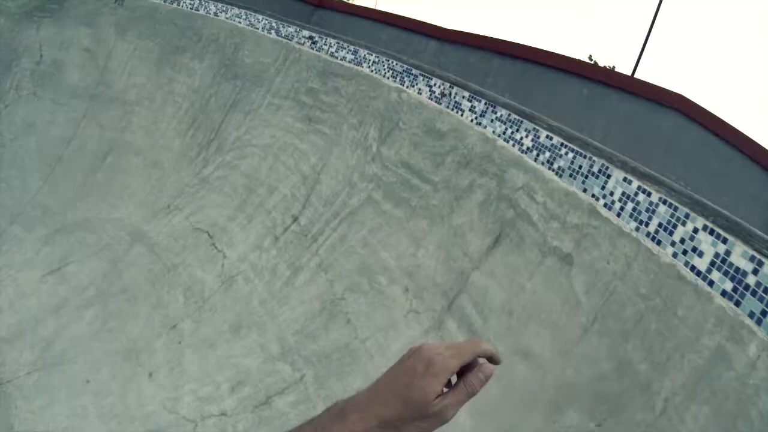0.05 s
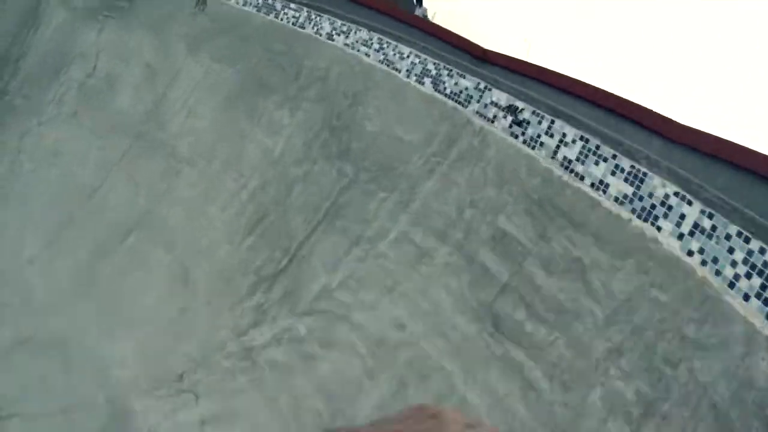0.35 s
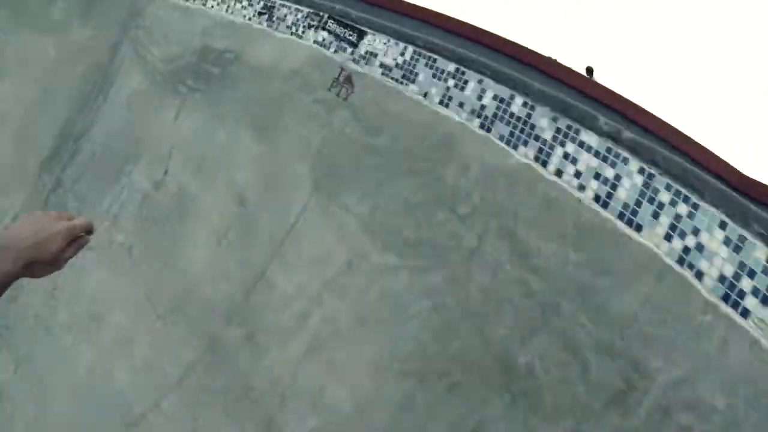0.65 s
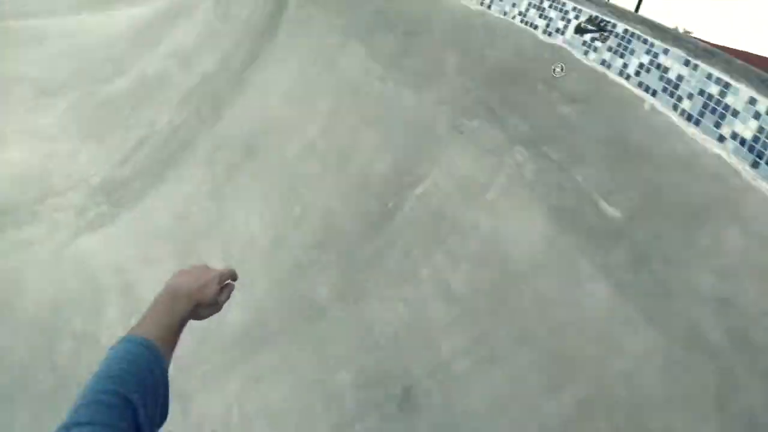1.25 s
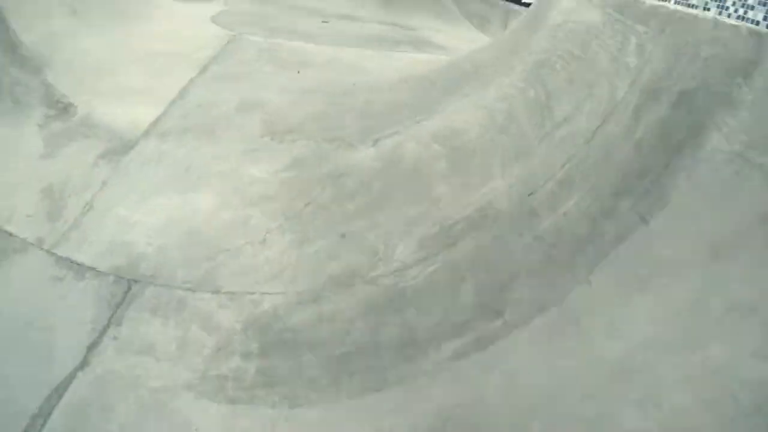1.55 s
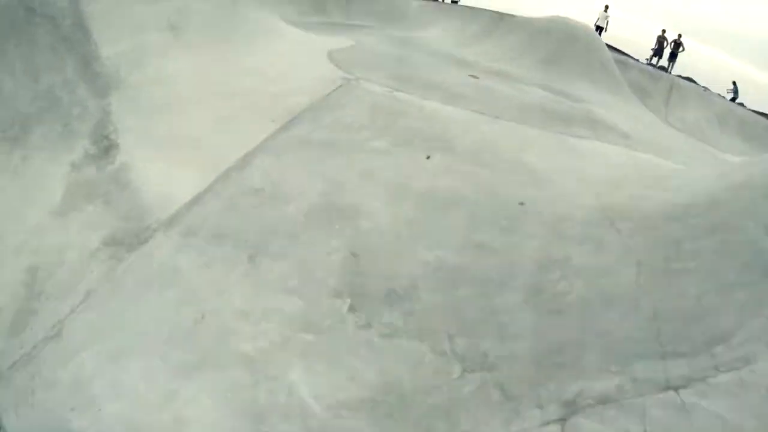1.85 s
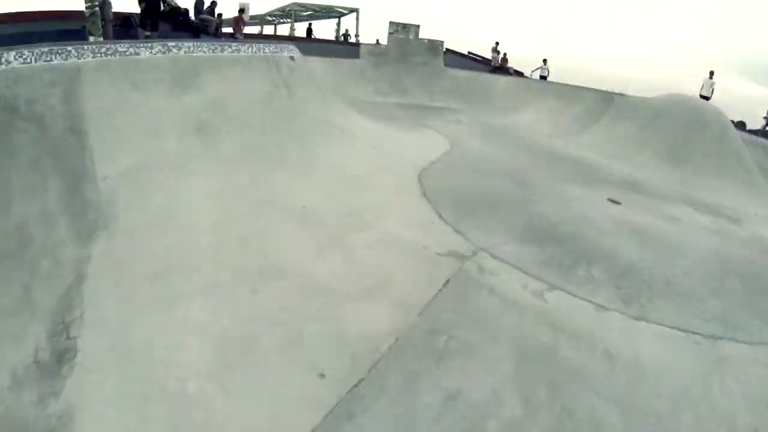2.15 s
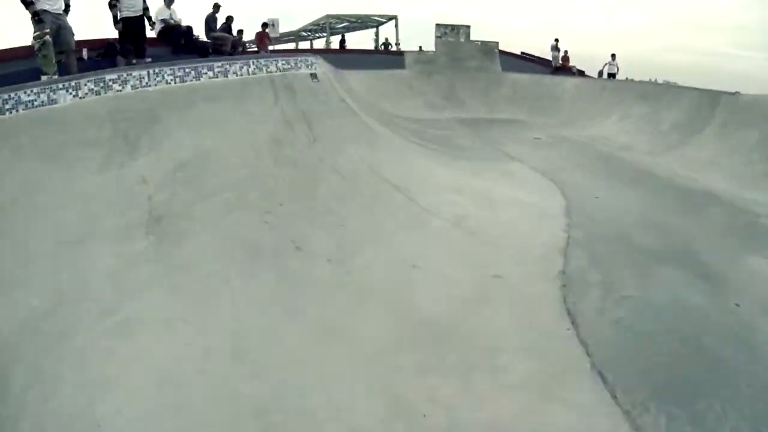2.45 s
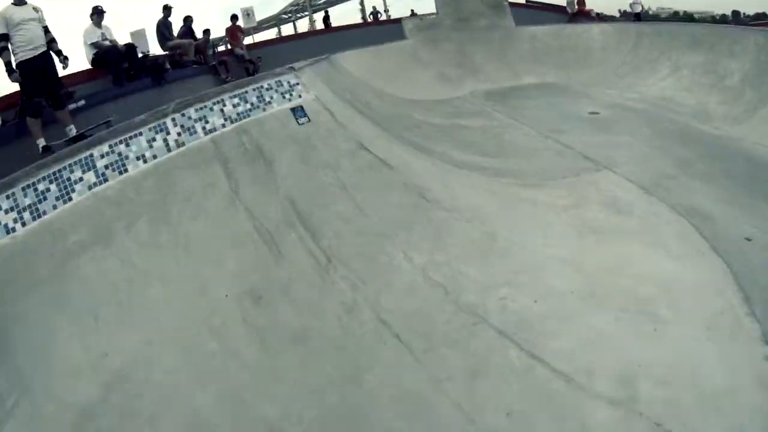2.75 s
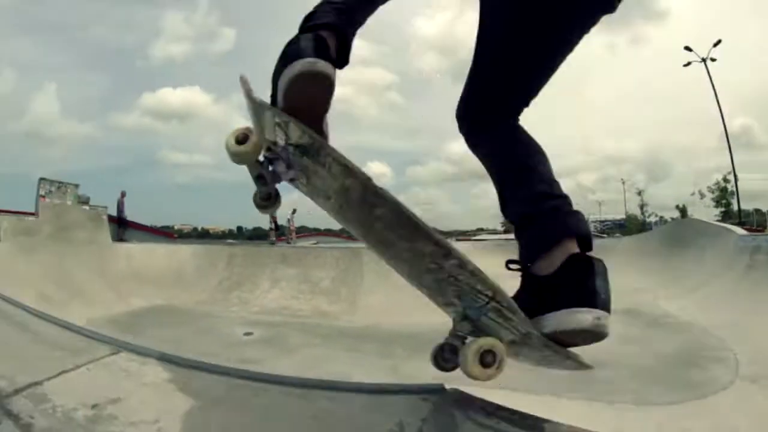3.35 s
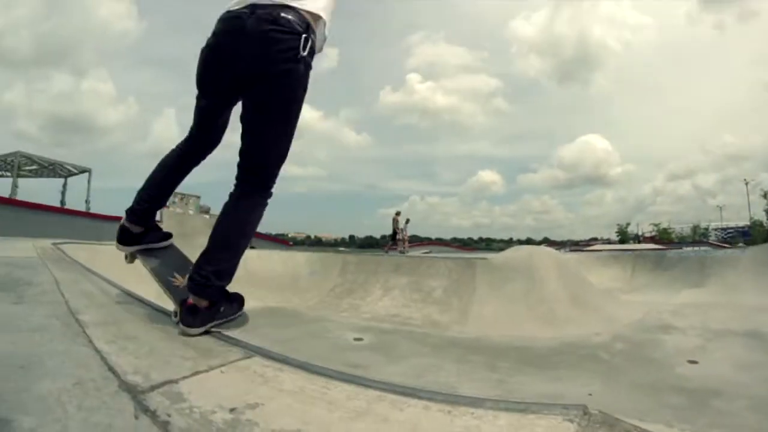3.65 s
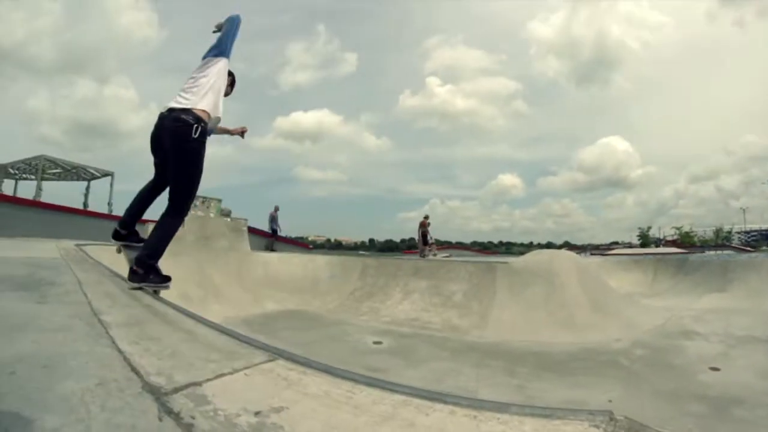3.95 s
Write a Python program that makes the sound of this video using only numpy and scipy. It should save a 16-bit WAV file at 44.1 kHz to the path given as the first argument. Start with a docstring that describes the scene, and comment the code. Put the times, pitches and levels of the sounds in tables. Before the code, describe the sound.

Skateboard wheels hum close by on smooth concrete under low wind buffeting, then turn rougher and hissier. The wind drops away and the board hits the bowl's edge with sharp clacks, a gritty scrape and a short grind.

```python
"""A skateboard carves a concrete bowl, heard from close behind with wind thudding on the microphone.
The wheels hum on smooth concrete, then from 1.8 s roar on a rougher slab. From 3 s the board is heard
from the rim, out of the wind: it rolls up, clatters over the edge, scrapes its tail, slaps down and
grinds on. The blows echo briefly in the bowl, and the hardest overload the microphone."""
import sys
import numpy as np
from scipy import signal
from scipy.fft import rfft, irfft, next_fast_len
from scipy.io import wavfile
from scipy.ndimage import uniform_filter1d, map_coordinates

SR = 44100
rng = np.random.default_rng(int(sys.argv[2]) if len(sys.argv) > 2 else 0)


def store_pcm(level_fs):
    """Save levels as 16-bit WAV."""
    pcm = np.round(np.clip(level_fs, -1, 1) * 32767).astype(np.int16)
    wavfile.write(sys.argv[1], SR, np.atleast_2d(pcm).T)


N = 176400
TIME = np.arange(N) / SR
SLAB_S, RIM_S, EDGE_S, SCRAPE_S = 1.83, 2.965, 3.17, 3.278


def amp(db):
    return 10 ** (np.asarray(db) / 20)


def unit(x):
    return x / np.sqrt(np.mean(x ** 2) + 1e-20)


def noise():
    return rng.standard_normal(N)


def along(points, hz):
    """Interpolate (Hz, value) points on a log frequency axis."""
    point_hz, values = np.transpose(points)
    return np.interp(np.log(hz + 1), np.log(point_hz + 1), values)


def curves(rows):
    """One value per sample for each column after the time."""
    times, *columns = np.transpose(rows)
    return [np.interp(TIME, times, column) for column in columns]


def wobble(knots_per_s):
    """A smooth random curve."""
    return map_coordinates(rng.standard_normal(4096), [TIME * knots_per_s], mode="wrap")


def after(s, fade_s):
    """A gate that opens around time s."""
    return np.clip((TIME - s) / fade_s + .5, 0, 1)


def filtered(x, response):
    """Apply a gain given as a function of Hz."""
    size = next_fast_len(N + SR // 2)
    return irfft(rfft(x, size) * response(np.fft.rfftfreq(size, 1 / SR)), size)[:N]


def coloured(x, colour):
    """Shape x by (Hz, dB) points, rolling off beyond both ends; rms 1."""
    low_hz, high_hz = colour[0][0] / 2, colour[-1][0] * 2
    skirts = lambda hz: 1 / np.sqrt((1 + (low_hz / (hz + 1)) ** 10) * (1 + (hz / high_hz) ** 10))
    return unit(filtered(x, lambda hz: amp(along(colour, hz)) * skirts(hz)))


def grit(per_s, share):
    """Force of a rough surface: single grains, with their share of the power, over a dense bed."""
    grains = (rng.random(N) < per_s / SR) * noise()
    return np.sqrt(share) * unit(grains) + np.sqrt(1 - share) * noise()


def resonance(centre_hz, width_hz):
    """A randomly driven resonance whose centre may move; rms 1."""
    slow = lambda: filtered(noise(), lambda hz: 1 / np.sqrt(1 + (hz / width_hz) ** 4))
    phase = 2 * np.pi * np.cumsum(centre_hz * np.ones(N)) / SR
    return unit(slow() * np.cos(phase) + slow() * np.sin(phase))


def add(track, start_s, sound):
    part = track[round(start_s * SR):][:len(sound)]
    part += sound[:len(part)]


# Blows of wheels, trucks and deck. Each row: start in seconds, ring in Hz, then ring, deck, clack and
# crack gains in dB.
BLOWS = [ (3.181, 800, 2, -9, -12, -13), (3.192, 760, 2, -17, -15, -12.5), (3.2, 812, 0.5, -8, -11, -8.5),
         (3.209, 830, 3.5, 2, -2.5, -16), (3.214, 812, 7, -11.5, -9, -8), (3.258, 590, -9, -29, -13, -38),
         (3.278, 315, -5.5, -21, -14, -15), (3.284, 620, -15, -8.5, -16.5, -12),
         (3.305, 552, 0, -8, -3, -13), (3.322, 569, 2.5, -4, 2.5, -4.5), (3.33, 704, -13, -17, -18, -15.5),
         (3.335, 547, -10, -12.5, -15, -22), (3.367, 600, -30, -28, -22, -24),
         (3.5172, 2140, 4.5, -12, 3, -7), (3.524, 850, -4, -19, -10, -25), (3.5402, 950, -14, -4, -6, -10),
         (3.551, 854, -15, -4, 2, -7.5), (3.638, 213, -11.5, -13, -7, -27),
         (3.643, 864, -13, -18, -14, -36), (3.686, 863, -18, -20, -18, -45),
         (3.702, 2064, -8, -36, -16.5, -36), (3.752, 836, -14, -34, -27, -42),
         (3.831, 810, -20.5, -36, -45, -50), (3.900, 844, -19, -44, -34, -47),
         (3.957, 846, -24, -45, -28.5, -50)]
# Deck modes. Each row: frequency in Hz, gain in dB, T60 in seconds.
DECK_MODES = [(107, -18.5, 0.076), (170, -10.5, 0.049), (241, -7, 0.08), (301, -11, 0.048),
              (401, -4.5, 0.055), (480.4, -4, 0.068), (686, -3.5, 0.046), (850, -0.5, 0.051),
              (993, -4.5, 0.047), (1298, -12, 0.053)]
# Impact spectra. Each row: frequency in Hz, gain in dB.
CLACK_COLOUR = [(200, -16.5), (400, -10), (700, -2.5), (1000, -3.5), (1500, -7.5), (2100, 1.5),
                (2700, -1.5), (3100, -7), (3500, -7.5), (4500, -20), (7000, -57), (15000, -52)]
CRACK_COLOUR = [(1500, -30), (3500, 9.5), (6300, 1.5), (7500, -6), (11000, -10), (15500, -17)]

def blows(clack_t60_s=0.034, crack_t60_s=0.024, attack_s=0.00048):
    """Each blow rings the struck part and the deck, with a woody clack and a hard crack."""
    track, t = np.zeros(N), np.arange(SR // 5) / SR
    clack, crack = coloured(noise(), CLACK_COLOUR), coloured(noise(), CRACK_COLOUR)
    mode = lambda hz, t60_s: amp(-60 * t / t60_s) * np.sin(2 * np.pi * hz * t)
    for start_s, ring_hz, ring_db, deck_db, clack_db, crack_db in BLOWS:
        offset = rng.integers(N - len(t))
        deck = sum((-1) ** k * amp(db + rng.normal(0, 3)) * mode(hz * (1 + 0.05 * rng.normal()), t60_s)
                   for k, (hz, db, t60_s) in enumerate(DECK_MODES))
        ring = mode(ring_hz, t60_s=0.039 * np.sqrt(800 / ring_hz))
        hit = amp(ring_db) * ring + amp(deck_db) * deck
        hit += amp(clack_db - 60 * t / clack_t60_s) * clack[offset:][:len(t)]
        hit += amp(crack_db - 60 * t / crack_t60_s) * crack[offset:][:len(t)]
        add(track, start_s, hit * (1 - np.exp(-t / attack_s)))
    return track


# Travel along the rim. Each row: time in seconds, wheel level in dB, grind level in dB.
RIM_LEVELS = [(2.97, -27.5, -50), (3.08, -24, -45), (3.16, -27.5, -27), (3.24, -24, -31.5), (3.3, -26, -28),
              (3.37, -34.5, -30.5), (3.46, -28.5, -29.5), (3.505, -36, -34.5), (3.55, -20, -24),
              (3.585, -32, -24.5), (3.61, -26.5, -25), (3.66, -21, -24), (3.73, -28, -32.5),
              (3.775, -27, -29.5), (3.8, -34, -36.5), (3.93, -34.5, -40), (4, -30.5, -41.5)]
# Roll and grind spectra at the rim. Each row: frequency in Hz, gain in dB.
RIM_ROLL_COLOUR = [(40, -20), (110, -2.5), (165, -1.5), (230, 0), (320, -7.5), (430, -0.5), (520, 3),
                   (640, 2), (760, 3), (880, 11), (1100, -8), (1500, -19), (2500, -24)]
GRIND_COLOUR = [(700, -20), (1300, 0), (1700, 4), (2300, 4.5), (3000, -4.5), (3700, -3), (4500, -18.5),
                (5700, -23), (6600, -29), (7500, -29), (11000, -32), (15500, -43)]

def rim_slide():
    """The wheels roll up to the rim, then the truck grinds along it and rings faintly."""
    wheel_db, grind_db = curves(RIM_LEVELS)
    slips_db = 1.34 * wobble(110)
    wheels = amp(wheel_db + slips_db) * coloured(grit(per_s=370, share=0.21), RIM_ROLL_COLOUR)
    truck = amp(-25) * resonance(centre_hz=6560, width_hz=240)
    grind = amp(grind_db + slips_db) * (coloured(grit(per_s=700, share=0.28), GRIND_COLOUR) + truck)
    return wheels * after(RIM_S, fade_s=.02) + grind * after(EDGE_S, fade_s=0.031)


# Scrape envelope. Each row: time in seconds, relative level in dB.
SCRAPE_LEVELS = [(3.28, -20.5), (3.3, -22.5), (3.332, -21), (3.35, -29), (3.41, -32.5), (3.455, -38),
                 (3.49, -45), (3.54, -79)]
# Scrape spectrum. Each row: frequency in Hz, gain in dB.
SCRAPE_COLOUR = [(2000, -7), (4000, 12), (7000, 4), (10500, 7), (13000, 0.5), (15500, -4)]

def tail_scrape():
    """The tail drags over the edge with a bright, gritty rasp."""
    level_db, = curves(SCRAPE_LEVELS)
    envelope = amp(level_db - 0.5 + 0.91 * wobble(170)) * after(SCRAPE_S, fade_s=0.014)
    return envelope * coloured(grit(per_s=2700, share=0.65), SCRAPE_COLOUR)


# Roll, skid and hum envelopes. Each row: time in seconds, relative level in dB.
SMOOTH_LEVELS = [(0.0, -34), (0.06, -31.5), (0.07, -33), (0.354, -36), (0.386, -33.5), (0.726, -34),
                 (0.842, -32.5), (1.574, -34.5), (1.648, -32.5), (1.664, -36.5), (1.794, -34), (1.8, -34.5)]
SKID_LEVELS = [(0, -67), (.55, -65), (.72, -55.5), (.95, -56), (1.15, -57.5), (1.35, -69)]
HUM_LEVELS = [(0, -45), (.2, -41.5), (.45, -38), (.62, -32), (.9, -45), (1.25, -33), (1.55, -48),
              (1.8, -44)]
# Pits and seams. Each row: start in seconds, relative level in dB.
PITS = [(.048, -21), (.248, -23.5), (0.388, -26.5), (.85, -19.5), (.922, -18), (1.127, -23), (1.15, -23),
        (1.198, -27.5), (1.62, -23.5), (1.832, -17), (2.359, -23.5), (2.54, -40), (2.697, -30),
        (2.955, -14)]
# Spectra of the roll through the camera's housing, and of the hum. Each row: frequency in Hz, gain in dB.
SMOOTH_COLOUR = [(130, -13), (242, -15.5), (326, -11), (458, -10), (560, -4), (640, -3), (780, -7.5),
                 (860, -14.5), (942, -7), (1130, -23.5), (1300, -6.5), (1430, -1), (1620, -6.5),
                 (1860, -25), (2140, -18.5), (2550, -27.5), (2950, -34), (3900, -30), (4570, -39),
                 (5100, -31), (5700, -38), (6100, -35.5), (7000, -40), (7900, -48), (8680, -36.5),
                 (9600, -45), (11400, -38), (12300, -48), (14500, -50), (15500, -60)]
HUM_COLOUR = [(80, 8.5), (115, -10), (200, -10.5), (330, -11.5), (480, -12), (600, -11)]

def smooth_roll(pit_t60_s=0.039, pit_cutoff_hz=3500):
    """Fine grit and pits make a hollow rolling sound, coloured by the camera's housing.
    A low hum lies under it, and the carve adds a faint skid."""
    (level_db,), (skid_db,), (hum_db,) = curves(SMOOTH_LEVELS), curves(SKID_LEVELS), curves(HUM_LEVELS)
    flutter = amp(1.18 * wobble(55))
    force = amp(level_db + 2.6) * flutter * grit(per_s=1100, share=0.27)
    pits, t = np.zeros(N), np.arange(SR // 10) / SR
    for start_s, db in PITS:
        add(pits, start_s, amp(db + 1 - 60 * t / pit_t60_s) * rng.standard_normal(len(t)))
    soft_pits = filtered(pits, lambda hz: 1 / np.sqrt(1 + (hz / pit_cutoff_hz) ** 2))
    roll = np.std(force + pits) * coloured(force + soft_pits, SMOOTH_COLOUR)
    skid = amp(skid_db) * resonance(centre_hz=6720, width_hz=330)
    hum = amp(hum_db) * coloured(noise(), HUM_COLOUR)
    return (roll + flutter * (skid + hum)) * (1 - after(RIM_S, fade_s=0.015))


# Rolling on the slab. Each row: time in seconds, roar level in dB, hiss level in dB.
ROUGH_LEVELS = [(1.83, -27.5, -38.5), (2.0, -27, -37), (2.12, -25.5, -38.5), (2.2, -23.5, -33.5),
                (2.32, -30, -36), (2.48, -28, -36.5), (2.55, -26.5, -32.5), (2.62, -24.5, -34.5),
                (2.75, -24.5, -32.5), (2.92, -20.5, -30.5)]
# Wheel whirr. Each row: time in seconds, pitch in Hz, level in dB.
WHIRR = [(1.83, 640, -22), (1.92, 670, -22.5), (2.01, 765, -20), (2.11, 810, -24), (2.2, 779, -30),
         (2.33, 640.5, -45.5), (2.5, 693.3, -26.5), (2.65, 730, -24.5), (2.88, 792.6, -24),
         (3.0, 720.7, -48), (3.1, 800, -26.5), (3.17, 709, -25.5)]
# Roar and hiss spectra. Each row: frequency in Hz, gain in dB.
ROAR_COLOUR = [(59, -30), (100, -8), (177, -10.5), (238, -6.5), (351, -8.5), (472, -2.5), (687, -7.5),
               (813, -1), (1150, -17.5), (1510, -10.5), (2010, -19), (2200, -19.5), (2860, -49),
               (4840, -120)]
HISS_COLOUR = [(1000, -22), (1700, -1), (2090, -15), (2360, -3.5), (3180, -8.5), (3760, -7), (4700, -12.5),
               (5510, -11), (7560, -21), (11000, -27), (15800, -42)]

def rough_roll():
    """Coarse concrete makes the wheels roar and hiss; their whirr bends with the load."""
    roar_db, hiss_db = curves(ROUGH_LEVELS)
    whirr_hz, whirr_db = curves(WHIRR)
    judder_db = 1.1 * wobble(70)
    whirr = amp(whirr_db) * resonance(whirr_hz, width_hz=86) * (1 - after(EDGE_S, fade_s=0.042))
    roar = amp(roar_db + judder_db) * coloured(grit(per_s=700, share=0.51), ROAR_COLOUR)
    hiss = amp(hiss_db + 1.2 * judder_db) * coloured(grit(per_s=400, share=0.27), HISS_COLOUR)
    return after(SLAB_S, fade_s=0.0072) * (whirr + (roar + hiss) * (1 - after(RIM_S, fade_s=0.031)))


# Spectrum of the climbing hiss. Each row: frequency in Hz, gain in dB.
APPROACH_COLOUR = [(710, -27), (1200, 3), (1290, -12), (1340, 4), (1550, 0), (1690, -1), (1970, 2),
                   (5490, -3), (8730, -23), (11100, -18.5), (15800, -40)]

def approach(level_db=-31):
    """Heard from the rim, the wheels hiss up the wall until the tail touches."""
    hiss = amp(level_db + wobble(61)) * coloured(grit(per_s=540, share=0.16), APPROACH_COLOUR)
    return hiss * after(RIM_S, fade_s=0.015) * (1 - after(SCRAPE_S, fade_s=0.016))


# Decay of the bowl. Each row: frequency in Hz, T60 in seconds.
BOWL_DECAY = [(200, .4), (2000, 0.29), (10000, 0.19)]

def bowl_echo(x, gain_db=-21.5, delay_s=0.024):
    """The concrete walls answer briefly, the treble dying first."""
    hz, t, spectrum = signal.stft(rng.standard_normal(SR // 2), SR, nperseg=256)
    decay = amp(-60 * t / along(BOWL_DECAY, hz)[:, None])
    _, tail = signal.istft(spectrum * decay, SR, nperseg=256)
    delayed = np.pad(x, (round(delay_s * SR), 0))
    return amp(gain_db) * signal.fftconvolve(delayed, tail / np.linalg.norm(tail))[:N]


# Gusts. Each row: time in seconds, relative level in dB.
WIND_LEVELS = [(0, -20.5), (.15, -16.5), (.27, -12.5), (.45, -11.5), (.68, -15), (.85, -17.5), (.98, -20),
               (1.1, -19), (1.28, -12.5), (1.41, -11), (1.57, -25), (1.73, -21.5), (1.78, -12), (1.88, -18),
               (2.04, -13), (2.15, -19), (2.57, -19.5), (2.76, -14.5), (2.86, -6.5), (2.95, -17)]
# Eddy spectrum. Each row: frequency in Hz, gain in dB.
WIND_COLOUR = [(14, -26), (22, -13), (32, 1), (44, -2.5), (54, -2), (64, -3), (72, -14), (85, -21.5),
               (105, -33.5), (150, -38.5), (250, -57)]

def wind():
    """Slow eddies thud on the moving microphone."""
    level_db, = curves(WIND_LEVELS)
    eddies = coloured(noise(), WIND_COLOUR)
    running_rms = np.sqrt(np.abs(uniform_filter1d(eddies ** 2, size=6000)) + .02)
    return amp(level_db - 2.0) * unit(eddies / running_rms) * (1 - after(RIM_S, fade_s=0.0247))


# Open-air spectrum. Each row: frequency in Hz, gain in dB.
AIR_COLOUR = [(25, -1), (60, -3), (110, -4), (160, -15), (260, -1), (600, -24)]

def air(level_db=-44.5):
    """A faint low rumble of the open park, heard at the rim."""
    return amp(level_db) * coloured(noise(), AIR_COLOUR) * after(RIM_S, fade_s=.02)


def whine(pulse_hz=60, start_db=-65.5, rim_drop_db=7.8):
    """The camera's electronics give a thin, rapidly pulsing whine, fainter at the rim."""
    pulses = (1 + 0.99 * np.cos(2 * np.pi * pulse_hz * TIME)) ** 2
    level_db = start_db - rim_drop_db * after(RIM_S, fade_s=.02)
    return amp(level_db) * unit(pulses * resonance(centre_hz=11370, width_hz=110))


def scene():
    """Rolling and the trick on the rim, over wind, air and whine; only the blows echo."""
    hits = blows()
    background = wind() + air() + whine()
    board = smooth_roll() + rough_roll() + approach() + rim_slide() + tail_scrape()
    return (hits + board + bowl_echo(hits) + background)[None]


def record(dry, ceiling=1.1, hardness=4, cutoff_hz=15900):
    """The microphone soft-clips the hardest blows; a brick-wall low-pass follows."""
    clipped = dry[0] / (1 + np.abs(dry[0] / ceiling) ** hardness) ** (1 / hardness)
    return filtered(clipped, lambda hz: hz < cutoff_hz)[None]


dry = scene()
out = record(dry)
store_pcm(out)
```